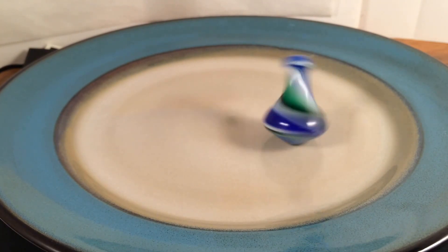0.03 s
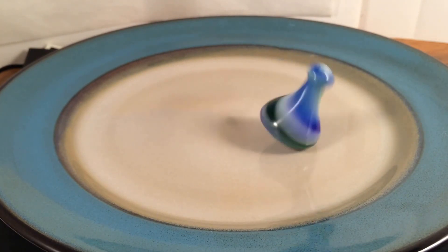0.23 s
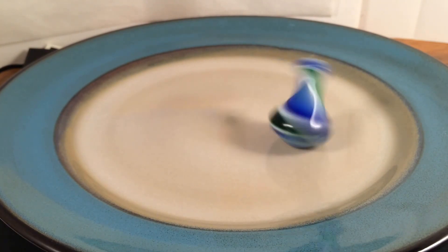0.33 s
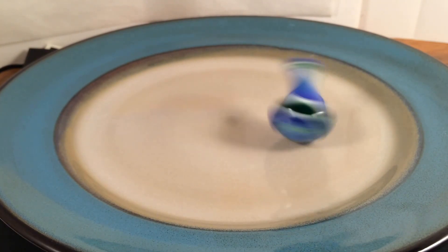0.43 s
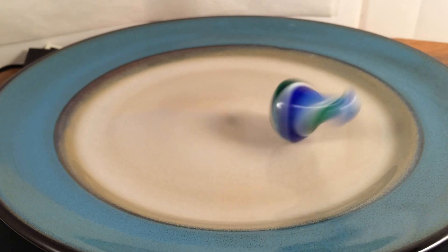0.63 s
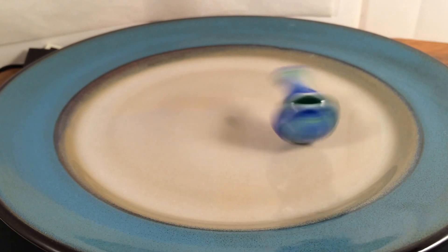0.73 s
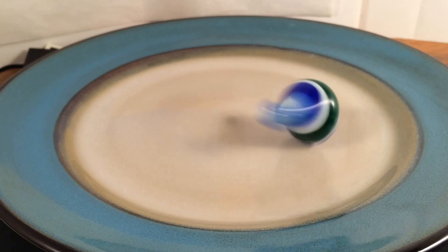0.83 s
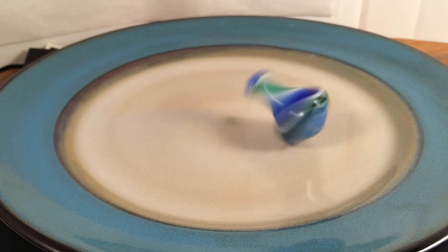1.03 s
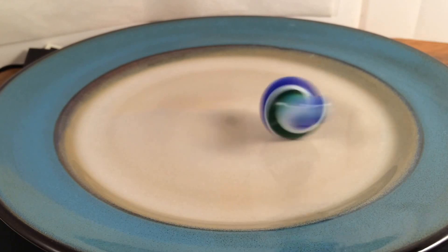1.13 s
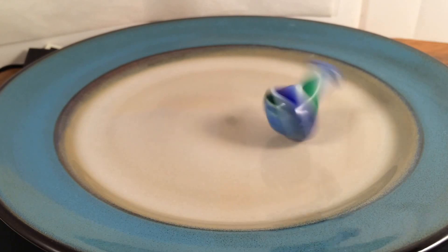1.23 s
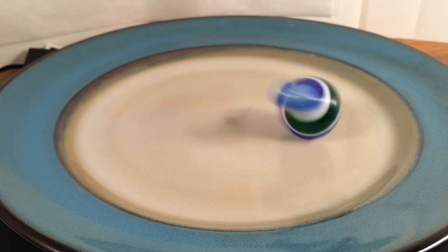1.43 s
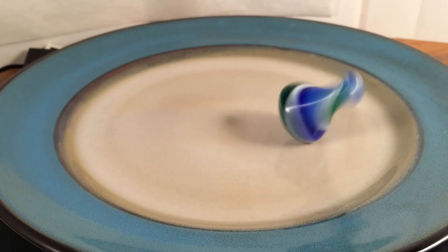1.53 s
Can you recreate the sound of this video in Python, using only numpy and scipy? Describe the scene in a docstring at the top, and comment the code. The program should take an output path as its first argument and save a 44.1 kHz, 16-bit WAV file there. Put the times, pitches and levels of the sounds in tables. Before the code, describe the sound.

Glass top skidding on a ceramic plate, with ringing chatter, then faint grazes.

```python
"""A small glass top wobbles on its side on a ceramic plate, close by in a quiet room.
Its rim skids twice with a hard, ringing chatter, rattles, then only grazes the glaze now and then.
Tiny impacts set glass and plate ringing, while friction adds a squeal and a dry rasp.
Under that the rolling makes the plate rumble, with a faint whirr that climbs and then sinks."""
import sys
import numpy as np
from scipy import signal
from scipy.fft import rfft, irfft
from scipy.io import wavfile
from scipy.ndimage import uniform_filter1d

SR = 44100
rng = np.random.default_rng(int(sys.argv[2]) if len(sys.argv) > 2 else 0)


def unload_wav(signal):
    """Save mono or channel-first audio to the path in sys.argv[1] as 16-bit WAV at rate SR, clipped to [-1, 1]."""
    wavfile.write(
        sys.argv[1],
        SR,
        np.round(np.clip(np.atleast_2d(signal).T, -1, 1) * 32767).astype(np.int16),
    )


N = 70560
TIME = np.arange(N) / SR


def amp(db):
    """Decibels to gain."""
    return 10 ** (np.asarray(db) / 20)


def unit(x):
    """Scales to an rms of one."""
    return x / np.sqrt(np.mean(x ** 2) + 1e-20)


def sine(hz):
    """A steady tone with an rms of one."""
    return unit(np.sin(2 * np.pi * hz * TIME))


def decay(t60, age=TIME):
    """An envelope that falls 60 dB in t60 seconds."""
    return np.exp(-np.log(1000) * age / t60)


def wander(rate_hz):
    """Smooth random motion up to about this rate."""
    rolloff = np.exp(-(np.fft.rfftfreq(N, 1 / SR) / rate_hz) ** 2)
    return unit(irfft(rfft(rng.standard_normal(N)) * rolloff, N))


def swell(peak, rise, fall):
    """Contact pressure grows and lets go: 21.5 dB down one rise before and one fall after the peak."""
    away = np.maximum((peak - TIME) / rise, (TIME - peak) / fall)
    return amp(-21.5 * np.minimum(away, 10) ** 1.07)


def colour(x, points):
    """A minimum-phase EQ of unit energy through (frequency [Hz], gain [dB]) points."""
    size = 8192
    hz, db = np.transpose(points)
    log_hz = np.log(abs(np.fft.fftfreq(size, 1 / SR)) + 1)
    log_gain = np.log(amp(np.interp(log_hz, np.log(hz), db)))
    taps = np.fft.ifft(np.exp(np.conj(signal.hilbert(log_gain)))).real[:size // 2]
    return signal.fftconvolve(x, taps / np.linalg.norm(taps))[:N]


def resonate(x, hz, width_hz):
    """A gliding resonance of about unit energy, with steep far skirts."""
    carrier = np.exp(2j * np.pi * np.cumsum(hz) / SR)
    pole = np.exp(-np.pi * width_hz / SR)
    envelope = signal.lfilter([np.sqrt(2 * (1 - pole * pole))], [1, -pole], x / carrier)
    return (carrier * signal.lfilter(*signal.butter(2, 280, fs=SR), envelope)).imag


def ring(x, hz, t60):
    """Excites one decaying mode of unit energy, with a softened attack."""
    attack = 1 - np.exp(-(TIME / 0.00074) ** 2)
    mode = sine(hz) * decay(t60) * attack
    return signal.fftconvolve(x, mode / np.linalg.norm(mode))[:N]


def rim_force(pressure):
    """Tiny impacts and a few knocks of the rim: a light touch ticks unevenly, a hard skid grinds."""
    # unevenness of the impacts: (pressure [dB], spread [dB])
    grain_spread = [(-54, 4), (-25.5, 1)]
    # single knocks of the rim: (time [s], strength [dB])
    knocks = [(0.204, -9.5), (0.2111, -0.5), (.298, -1.5), (0.3687, -16), (0.408, -11.5), (0.4468, -10)]
    grains_per_s, chatter_db = 4400, 2
    spread_db = np.interp(20 * np.log10(pressure), *np.transpose(grain_spread))
    grains = (rng.random(N) < grains_per_s / SR) * rng.choice([-1, 1], N)
    grains = grains * amp(spread_db * rng.standard_normal(N))
    grains /= np.sqrt(np.maximum(uniform_filter1d(grains ** 2, size=350), 1e-6))  # level over 8 ms
    chatter = unit(amp(chatter_db * wander(rate_hz=220)))  # the rim bounces, so the force flutters
    force = pressure * grains * chatter
    for s, db in knocks:
        force[round(s * SR)] += amp(db)
    return force


def squeal(pressure, hz):
    """Friction keeps up a rough, wavering tone that follows the pressure."""
    level_db, pitch_waver, roughness = 1, 0.01305, 0.24
    phase = 2 * np.pi * np.cumsum(hz * (1 + pitch_waver * wander(rate_hz=160))) / SR
    flutter = 1 + roughness * wander(rate_hz=96)
    return amp(level_db) * pressure * np.sqrt(2) * np.sin(phase) * flutter


def skidding_top():
    """The glass rim skids on the glaze, squealing and driving the resonances of top and plate."""
    # skids: (peak time [s], rise [s], fall [s], pressure [dB], squeal pitch [Hz], plate pitch [Hz],
    # plate drive [dB], ringing drive [dB])
    skids = [(0.022, 0.1, 0.11, -48.5, 2350, 1386, -9.5, -6.5),
             (0.059, 0.012, 0.024, -51.5, 2370, 1410, -3, -8),
             (0.1, 0.004, 0.021, -43.5, 2360, 1470, -8, 0),
             (0.145, 0.027, 0.0069, -40.5, 2370, 1420, -9.5, -8),
             (0.162, 0.026, 0.035, -52, 2370, 1383, -3.5, -4),
             (0.199, 0.025, 0.01, -39.5, 2312, 1400, -6.5, 1.5),
             (0.21, 0.0074, 0.0099, -20, 2320, 1797, -15, 1.5),
             (0.221, 0.0077, 0.027, -20.5, 2324, 1922, -15, 1.5),
             (0.282, 0.02, 0.014, -47, 2340, 1400, -5, -5.5),
             (0.302, 0.0035, 0.03, -29.5, 2318, 1430, 0, -11),
             (0.317, 0.016, 0.039, -18.5, 2320, 1357, -33.5, 2.5),
             (.367, 0.002, 0.016, -30, 2350, 1410, -17, -0.5),
             (0.383, 0.0082, 0.0034, -24.5, 2320, 1406, -21.5, -6.5),
             (.396, 0.023, 0.027, -36.5, 2330, 1322, -9.5, -6),
             (0.41, 0.015, 0.066, -40, 2330, 1666, -6.5, 0),
             (0.449, 0.0062, .011, -31.5, 2370, 1756, -13, -1.5),
             (0.467, 0.0078, 0.0098, -51.5, 2394, 1360, -3, -7),
             (0.777, 0.004, 0.027, -56, 2337, 1386, -3.5, -11.5),
             (0.852, 0.0092, 0.013, -62, 2360, 1401, 1.5, -14),
             (0.913, 0.023, 0.025, -59, 2360, 1390, -2.5, -29.5),
             (0.939, 0.023, 0.016, -51, 2340, 1388, 1, 0.5),
             (0.975, 0.04, 0.033, -49.5, 2390, 1416, -5, -21),
             (0.992, 0.0084, 0.0087, -45, 2400, 1387, -5.5, -7),
             (1.21, 0.0049, 0.035, -69.5, 2445, 1734, -11.5, 0),
             (1.275, 0.023, 0.041, -68.5, 2400, 1597, -2.5, 0),
             (1.329, 0.0059, 0.033, -59.5, 2380, 1680, -5.5, 3),
             (1.356, 0.0061, 0.057, -54.5, 2408, 1700, -5, 0),
             (1.413, 0.0092, 0.036, -55.5, 2394, 1766, -5, -14.5),
             (1.538, 0.013, 0.057, -53.5, 2380, 1620, 0, 3.5),
             (1.573, 0.059, 0.043, -51, 2360, 1710, -4.5, -28)]
    # dull, quickly damped response of top and plate: (frequency [Hz], gain [dB])
    body_eq = [(300, -26.5), (700, -17.5), (1000, -25), (1200, -14), (1370, 0), (1560, -25), (1760, -4),
               (2100, -9), (2320, 9.5), (2560, 5.5), (2800, -10.5), (3050, -11.5), (3400, -12), (3620, -2),
               (4050, -16), (4350, -43.5), (4800, -35.5), (5800, -49), (7500, -42.5), (8600, -51.5),
               (15000, -64.5)]
    # ringing modes of plate and glass: (frequency [Hz], gain [dB], t60 [s])
    modes = [(878.7, -43, 0.22), (1347, -30, 0.086), (2536, -19.5, 0.04), (2670, -25.5, .08),
             (2895, -37, 0.13), (3603, -15.5, 0.04), (3700, -22.5, .04), (4270, -40, 0.039),
             (4976, -19, 0.088), (5440, -22, 0.17), (5516, -29, 0.25), (6912, -25, 0.079),
             (6904, -33, 0.09), (7750, -39, .12), (9283, -36, 0.12), (9330, -35, .14), (9930, -51.5, .17),
             (10850, -60, .2), (12100, -46.5, .15), (13990, -60, 0.13), (15200, -64.5, .06)]
    rolling_db = -84  # the light contact that never stops
    powers = np.array([amp(db) * swell(*timing) for *timing, db in (row[:4] for row in skids)]) ** 2
    powers += 1e-20
    pressure = np.sqrt(powers.sum(0) + amp(rolling_db) ** 2)
    # overlapping skids blend their pitches and drives, the strongest leading
    squeal_hz, plate_hz, plate_db, ring_db = np.transpose(skids)[4:] @ powers / powers.sum(0)
    force = rim_force(pressure)
    plate = resonate(force * amp(plate_db), plate_hz, width_hz=125)
    body = amp(-5.5) * colour(force, body_eq)
    ringing = sum(amp(db) * ring(force * amp(ring_db), hz, t60) for hz, db, t60 in modes)
    return plate + squeal(pressure, squeal_hz) + body + ringing


def rumble():
    """The rolling top shakes the plate on the table: low noise and a drone that follows its speed."""
    # drone of the rolling rim: (time [s], pitch [Hz], level [dB])
    drone_path = [(0.082, 120.2, -80), (.14, 133.6, -56.5), (.21, 159.3, -46), (0.271, 173, -54.5),
                  (0.421, 137.8, -51), (0.518, 132.8, -51), (0.621, 133.6, -62.5)]
    # tone of the shaking plate: (frequency [Hz], gain [dB])
    shake_eq = [(20, -30), (45, -15), (66, -3), (105, -6.5), (135, -3.5), (160, -2), (180, -1.5), (215, -4),
                (260, -12), (380, -17.5), (540, -22.5), (800, -31), (1300, -31.5), (2200, -41), (5000, -52)]
    # loudness of the shaking: (time [s], level [dB])
    shake_levels = [(0, -51), (.09, -52), (.62, -51), (1.25, -52), (1.6, -49.5)]
    s, hz, db = np.transpose(drone_path)
    phase = 2 * np.pi * np.cumsum(np.interp(TIME, s, hz)) / SR
    drone = amp(np.interp(TIME, s, db)) * unit(np.sin(phase + 0.46 * wander(rate_hz=28)))
    shake = unit(colour(rng.standard_normal(N), shake_eq))
    return amp(np.interp(TIME, *np.transpose(shake_levels))) * shake + drone


def whirr():
    """A faint, fuzzy tone with a weaker upper partial climbs, then sinks and lingers on resonances."""
    # glide of the whirr: (time [s], pitch [Hz], level [dB])
    glide = [(0, 419, -84.5), (.17, 545, -62), (0.3, 607.6, -79.5), (0.589, 720.5, -84), (.66, 679, -65.5),
             (0.8, 681, -66), (1.0, 599.5, -71.5), (1.132, 496, -74.5), (1.39, 500, -75),
             (1.47, 534.4, -62.5), (1.6, 503, -77)]
    # resonances that sing as the whirr sinks through them: (start [s], end [s], pitch [Hz], level [dB])
    resonances = [(0.622, 0.833, 706, -60.5), (.785, 0.937, 660, -66.5), (0.834, 1.057, 590, -66),
                  (1.037, 1.557, 496.2, -70)]
    width_hz, upper_ratio, upper_db, fade_s = 51, 1.72, -6.5, 0.037
    s, hz, db = np.transpose(glide)
    phase = 2 * np.pi * np.cumsum(np.interp(TIME, s, hz)) / SR
    lower = wander(width_hz) * np.sin(phase + wander(width_hz))
    upper = wander(2 * width_hz) * np.sin(upper_ratio * phase + wander(width_hz))
    tone = amp(np.interp(TIME, s, db)) * (unit(lower) + amp(upper_db) * unit(upper))
    for start, end, ring_hz, ring_db in resonances:
        fade = np.clip(np.minimum(TIME - start, end - TIME) / fade_s, 0, 1)
        tone += amp(ring_db) * fade * sine(ring_hz)
    return tone


def room_tone():
    """A quiet, steady bed of hiss and low hum."""
    # tone of the hiss: (frequency [Hz], gain [dB])
    hiss_eq = [(30, 0.5), (500, 0.5), (1500, 8), (3000, 5.5), (6000, 8.5), (10000, 2.5), (15000, -10)]
    hiss = amp(-80) * unit(colour(rng.standard_normal(N), hiss_eq))
    hum = amp(-59.5) * sine(hz=178.7)
    return hiss + hum


def rub(strokes, eq):
    """Friction noise that swells with each stroke."""
    level = sum(amp(db) * swell(peak, rise, fall) for peak, rise, fall, db in strokes)
    return colour(level * rng.standard_normal(N), eq)


def grit():
    """Dry, gritty hisses at the contact that hardly ring."""
    # gritty strokes: (peak time [s], rise [s], fall [s], level [dB])
    strokes = [(0.0907, 0.0027, 0.011, -52), (0.0995, 0.0012, 0.014, -46.5), (0.846, 0.026, 0.13, -65),
               (.99, 0.0043, 0.0062, -53.5)]
    # tone of the grit: (frequency [Hz], gain [dB])
    grit_eq = [(500, -3), (1500, 15.5), (5000, -1), (9000, -13), (15000, -15.5)]
    return rub(strokes, grit_eq)


def rasp():
    """The rim drags with a coarser, higher rasp."""
    # drags of the rim: (peak time [s], rise [s], fall [s], level [dB])
    drags = [(.214, .012, .016, -27), (.329, .02, 0.0064, -27), (.384, 0.014, 0.0054, -36.5),
             (.41, 0.03, 0.04, -44.5)]
    # tone of the rasp: (frequency [Hz], gain [dB])
    rasp_eq = [(2000, -35.5), (2700, -9.5), (3250, -2), (3620, 11.5), (4050, -10.5), (4400, -43),
               (7000, -58.5)]
    return rub(drags, rasp_eq)


def plate_bell():
    """The plate's long, pure note, renewed by the firmer blows."""
    # blows that set the plate singing: (time [s], level [dB])
    blows = [(.208, -50), (.32, -52), (.99, -72.5), (1.412, -68)]
    attack_s, t60_s = 0.008, 0.62
    level = np.zeros(N)
    for s, db in blows:
        age = np.maximum(TIME - s, 0)
        level += amp(db) * np.minimum(age / attack_s, 1) * decay(t60_s, age)
    return level * sine(hz=1820)


def glass_tinks():
    """One high note of the glass swells briefly as it is rubbed."""
    # tinks of the glass: (peak time [s], level [dB])
    tinks = [(0.328, -36), (0.418, -46.5), (0.944, -67.5), (1.371, -73)]
    return sum(amp(db) * swell(s, rise=0.014, fall=0.037) for s, db in tinks) * sine(hz=5483)


def reverb(x):
    """The room's faint, diffuse tail, whose treble dies first."""
    noise = rng.standard_normal(N) * (TIME > 0.005)  # 5 ms pre-delay
    low = signal.sosfilt(signal.butter(2, 4000, fs=SR, output="sos"), noise)
    tail = low * decay(t60=0.3) + 0.5 * (noise - low) * decay(t60=0.093)
    return amp(-29.5) * signal.fftconvolve(x, tail / np.linalg.norm(tail))[:N]


def scene():
    """The contact sounds with a touch of reverb, over rumble, whirr and room tone, in mono."""
    contact = skidding_top() + grit() + rasp() + plate_bell() + glass_tinks()
    return (contact + reverb(contact) + rumble() + whirr() + room_tone())[None]


def record(dry):
    """A steep low-pass takes off the highest treble."""
    lowpass = signal.firwin(511, cutoff=15400, window=("kaiser", 9), fs=SR)
    return signal.oaconvolve(dry, lowpass[None], "same")


dry = scene()
out = record(dry)
unload_wav(out)
```